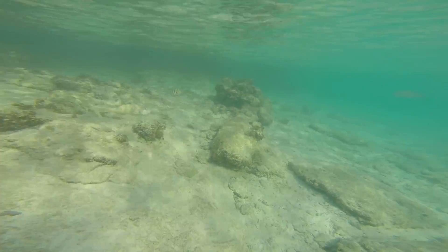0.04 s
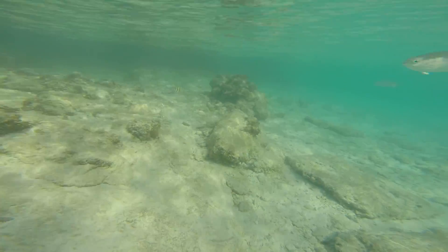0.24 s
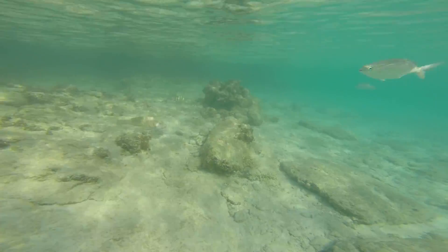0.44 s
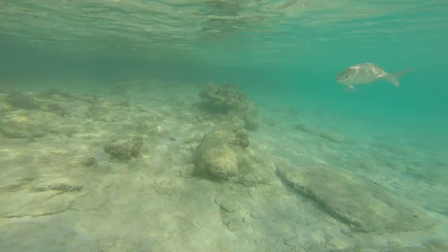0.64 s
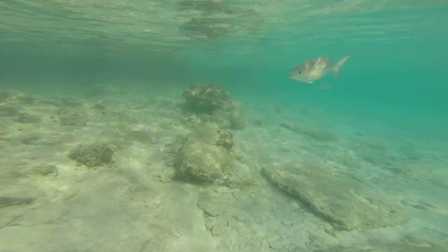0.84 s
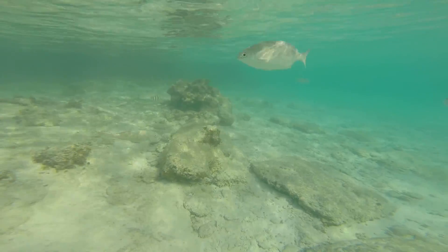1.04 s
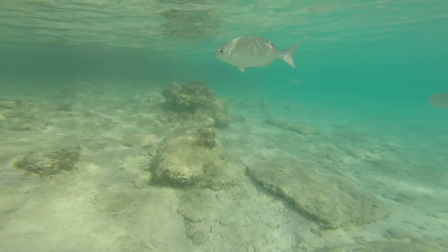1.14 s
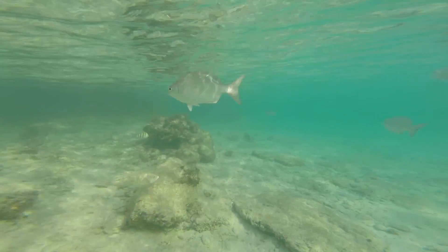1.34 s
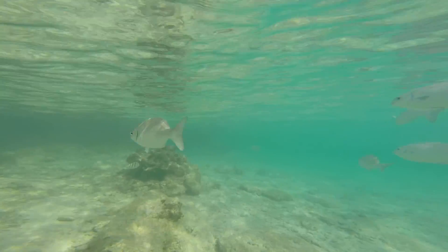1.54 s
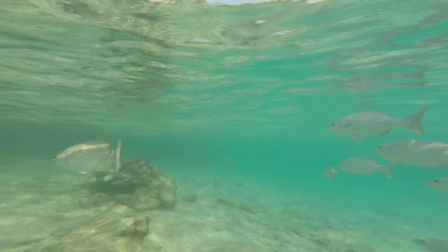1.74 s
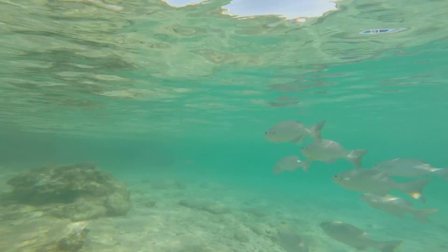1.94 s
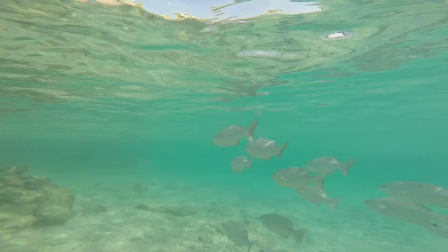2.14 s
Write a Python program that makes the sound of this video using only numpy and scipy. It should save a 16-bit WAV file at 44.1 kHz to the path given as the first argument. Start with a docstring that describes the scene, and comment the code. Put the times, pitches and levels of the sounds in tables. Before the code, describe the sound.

One sharp plastic knock sounds early, heard from inside a camera case drifting underwater. Quiet water hiss and low rumble continue with scattered shrimp clicks and a few tiny bubble blips, and water bumps the case past the middle.

```python
"""A sharp knock rings the plastic case of an underwater camera drifting over a shallow reef.
Snapping shrimp, near and far, crackle through its wall: each snap sets the same case ringing.
Water hisses, rumbles and sloshes round the case and shoves it twice, and a few small bubbles blip.
The camera's electronics add a faint whine."""
import sys
import numpy as np
from scipy import signal
from scipy.fft import rfft, irfft
from scipy.io import wavfile
from scipy.ndimage import uniform_filter1d

SR = 44100
rng = np.random.default_rng(int(sys.argv[2]) if len(sys.argv) > 2 else 0)


def wav_record(signal):
    """Record a signal, one row per channel, as 16-bit PCM in the file named by sys.argv[1]."""
    frames = np.transpose(np.atleast_2d(signal))
    bounded = np.clip(frames, -1, 1)
    # unit amplitude maps onto the largest positive 16-bit level
    quanta = np.round(bounded * 32767).astype(np.int16)
    wavfile.write(sys.argv[1], SR, quanta)


N = 97020


def amp(db):
    return 10 ** (np.asarray(db) / 20)


def unit(x):
    """Scales a sound to an average (rms) strength of 1."""
    return x / np.sqrt(np.mean(abs(x) ** 2) + 1e-20)


def add(mix, s, sound):
    """Mixes a sound in at s seconds."""
    part = mix[max(round(s * SR), 0):][:len(sound)]
    part += sound[:len(part)]


def band(x, hz, kind, order=2):
    """Keeps the low, high or middle pitches; a higher order cuts more sharply."""
    return signal.sosfilt(signal.butter(order, hz, kind, fs=SR, output="sos"), x)


def delayed(x, s):
    """A short sound, s seconds later."""
    hz = np.fft.rfftfreq(len(x), 1 / SR)
    return irfft(rfft(x) * np.exp(-2j * np.pi * hz * s), len(x))


def scattered(pulse, share, fade_s):
    """Adds a short noisy tail that fades by 60 dB in fade_s."""
    t = np.arange(len(pulse)) / SR
    return pulse + share * abs(pulse).max() * rng.standard_normal(len(t)) * amp(-60 * t / fade_s)


def wash(level_db=-56, patch_db=1.75, flicker_db=-0.1, size=512):
    """Steady water noise running up into hiss, wavering in small patches of pitch and time."""
    # tone of the water noise (pitch [Hz], relative level [dB])
    tone = [(25, 0), (50, 0), (100, -2), (200, -5.5), (350, -9.5), (600, -13.5), (1000, -16.5), (1700, -19),
            (2600, -21.5), (4200, -25), (6000, -28.5), (8000, -32), (10500, -34.5), (13000, -41.5),
            (15000, -48)]
    slices = signal.stft(rng.standard_normal(N), nperseg=size)[2]  # rows are pitches, columns are moments
    patches = uniform_filter1d(rng.standard_normal(slices.shape), size=5, axis=0)
    patches = unit(uniform_filter1d(patches, size=6, axis=1))
    flicker = unit(uniform_filter1d(rng.standard_normal(slices.shape[1]), size=4))
    stirred = signal.istft(slices * amp(patch_db * patches + flicker_db * flicker), nperseg=size)[1][:N]
    hz, db = np.transpose(tone)
    colour = amp(np.interp(np.log(np.fft.rfftfreq(N, 1 / SR) + 1), np.log(hz + 1), db))
    return amp(level_db) * unit(irfft(rfft(stirred) * colour, N))


def eddies(levels, low_hz, high_hz):
    """Swirls of one size range, swelling as water moves past the camera."""
    churn = unit(band(rng.standard_normal(N), [low_hz, high_hz], "band"))
    return churn * amp(np.interp(np.arange(N) / SR, *np.transpose(levels)))


def swirling_water():
    """Big swirls make a deep rumble, and smaller ones slosh above it."""
    # loudness of the rumble (time [s], level [dB])
    rumble = [(0, -65), (.5, -74), (1.1, -69), (1.28, -58), (1.43, -64), (1.62, -65.5), (1.95, -65),
              (2.08, -55.5), (2.2, -54.5)]
    # loudness of the sloshing (time [s], level [dB])
    slosh = [(0, -68), (.75, -65.5), (.92, -65), (1.15, -64.5), (1.75, -73), (1.9, -61.5), (2.2, -66)]
    return eddies(rumble, low_hz=23, high_hz=75) + eddies(slosh, low_hz=119, high_hz=372)


def whine(width_hz=6):
    """Thin, slightly unsteady tones of the electronics."""
    # the tones (pitch [Hz])
    pitches = [5845, 5874, 8781, 11719, 14626]
    # loudness of each tone (level [dB])
    levels = [-77, -80, -82, -90, -90]
    t, out = np.arange(N) / SR, np.zeros(N)
    for hz, db in zip(pitches, levels):
        drift = np.sqrt(2 * np.pi * width_hz / SR) * np.cumsum(rng.standard_normal(N))
        out += amp(db) * np.sqrt(2) * np.sin(2 * np.pi * hz * t + drift)
    return out


def housing(size=1536):
    """The ring of the case after one sharp pulse."""
    # the case's own notes (pitch [Hz], relative level [dB], time to fade by 60 dB [s])
    notes = [(1494, -31.5, 0.022), (1580, -27.5, 0.018), (1870, -24.5, 0.026), (2030, -27.5, 0.022),
             (2495, -18, .012), (2835, -23, 0.013), (3570, -35, 0.012), (4240, -43, 0.018),
             (6460, -30.5, 0.0036), (7480, -30, 0.0063), (8800, -42, 0.0066), (9470, -46, 0.012),
             (10800, -52, 0.0073), (13400, -39, .006)]
    t = np.arange(size) / SR
    return sum(amp(db - 60 * t / fade_s) * np.sin(2 * np.pi * hz * t) for hz, db, fade_s in notes)


def snap(levels_db, filters, crack=0.99, echo_spread=.4, window_s=.006):
    """One shrimp's crack rings the case and bounces back from its walls, the wave upside down."""
    # echoes inside the case (delay [ms], typical strength [ratio])
    case_echoes = [(0.583, 0.2), (0.967, 0.13)]
    ring = housing()
    pulse = scattered(ring / abs(ring).max(), share=0.34, fade_s=0.0065)
    pulse += crack * signal.unit_impulse(len(ring))
    echoes = sum(share * (1 + echo_spread * rng.uniform(-1, 1)) * delayed(pulse, ms / 1000)
                 for ms, share in case_echoes)
    parts = [amp(db) * unit(signal.sosfilt(sos, pulse - echoes)) for sos, db in zip(filters, levels_db)]
    return sum(parts) * np.sqrt(window_s * SR / len(pulse))  # levels count as if it lasted window_s


def shrimp(near_gain_db=-0.5, far_per_s=60):
    """Near snaps stand out of a faint random crackle of far ones."""
    # a snap's four pitch bands: body, click, crack and fizz (low edge [Hz], high edge [Hz])
    snap_bands = [(1300, 3200), (3450, 5350), (5700, 8100), (8600, 13200)]
    # near snaps, before near_gain_db (time [s], body [dB], click [dB], crack [dB], fizz [dB])
    near_snaps = [(0.0578, -81, -60, -59, -59), (0.078, -53.5, -59, -63, -50.5),
                  (0.1005, -43, -48.5, -77, -59), (0.2018, -81, -62, -84, -65),
                  (0.2336, -49, -53, -58, -63), (0.3035, -72, -58.5, -56.5, -56.5),
                  (0.3402, -52.5, -47, -53, -63), (0.3749, -69, -60.5, -57, -53.5),
                  (0.416, -70, -60, -63.5, -76), (0.5317, -82, -72, -61, -63),
                  (0.595, -64, -60.5, -56, -68), (0.6046, -81, -84, -61, -54), (0.6888, -49, -57, -71, -60),
                  (0.865, -82, -83, -75, -66), (0.873, -64, -58.5, -84, -66), (0.947, -58, -61, -86, -85),
                  (0.9911, -61, -63, -58.5, -60.5), (1.0474, -45, -51.5, -59, -67),
                  (1.1395, -83, -68, -73, -63), (1.1953, -62, -57, -64, -67),
                  (1.2152, -58, -50, -54.5, -52.5), (1.23, -50, -54, -73, -62),
                  (1.2397, -62, -58, -56.5, -57), (1.2712, -80, -63, -60, -59.5),
                  (1.2941, -58.5, -55.5, -57.5, -66), (1.3453, -52.5, -53, -55.5, -68),
                  (1.3849, -61, -58, -80, -71), (1.3913, -80, -58.5, -66, -64.5),
                  (1.432, -86, -66, -66, -68), (1.457, -78, -77, -66, -66), (1.484, -75, -81, -68, -66),
                  (1.5693, -60.5, -54, -69, -58), (1.64, -68, -67, -76, -62.5), (1.719, -63, -59, -68, -69),
                  (1.7621, -56.5, -53, -59.5, -63), (1.808, -84, -83, -68, -64),
                  (1.8547, -43.5, -41.5, -40, -51), (1.9013, -66, -60.5, -71, -63),
                  (1.909, -79, -71, -60.5, -68), (1.9657, -65, -62.5, -70, -55.5),
                  (2, -85, -60.5, -65, -74), (2.0126, -76, -60, -66, -68), (2.023, -75, -79, -74, -65.5),
                  (2.038, -65, -63, -87, -85)]
    # each band of a far snap, before its random size and colour (level [dB])
    far_levels = [-79, -78, -80, -84]
    out = np.zeros(N)
    filters = [signal.butter(4, edges, "band", fs=SR, output="sos") for edges in snap_bands]
    for s, *levels_db in near_snaps:
        add(out, s, amp(near_gain_db) * snap(levels_db, filters))
    for _ in range(round(far_per_s * N / SR)):
        size_db = 2.5 * min(rng.exponential(), 2)
        colour_db = rng.uniform(-3, 3, len(far_levels))
        add(out, rng.random() * N / SR, snap(np.array(far_levels) + size_db + colour_db, filters))
    return out


def bubbles(rise_cycles=3.1, glide_per_cycle=-0.0035, size=6000):
    """Soft blips and gurgles: the larger the bubble, the lower and longer it rings."""
    # ringing bubbles (time [s], starting pitch [Hz], level [dB])
    blips = [(0.209, 1390, -47), (.296, 1600, -53), (0.927, 338, -52), (1.422, 1260, -52),
             (1.837, 1770, -54.5), (1.883, 1790, -52.5), (1.891, 219, -53), (2.078, 1580, -55)]
    out = np.zeros(N)
    for s, hz, db in blips:
        cycles = hz * np.arange(size) / SR
        swell = cycles / rise_cycles * np.exp(1 - cycles / rise_cycles)
        sinking_hz = hz * np.exp(glide_per_cycle * cycles)
        add(out, s, amp(db) * swell * np.sin(2 * np.pi * np.cumsum(sinking_hz) / SR))
    return out


def knock(start_s=.2482, gain_db=2, wall_hz=1310, soften_hz=10400):
    """One sharp knock rings the case, with quick echoes that blend into it."""
    # quick echoes of the knock (delay [ms], strength [ratio; minus flips the wave])
    echoes = [(1.06, -0.66), (1.95, 0.83), (6.49, -0.083)]
    ring, out = housing(), np.zeros(N)
    blow = ring + sum(strength * delayed(ring, ms / 1000) for ms, strength in echoes)
    blow = scattered(blow, share=.04, fade_s=0.0061)
    blow = band(blow, wall_hz, "high", order=8)  # the stiff wall lets little low sound through
    add(out, start_s, amp(gain_db) * band(blow, soften_hz, "low", order=3))
    return out


def shoves(start_hz=300, end_hz=56.6, sag_s=0.0048, peak_s=0.017, width_s=.0062):
    """Dull thumps of water against the case, each a short wobble whose pitch drops."""
    # pushes of water (time [s], level [dB])
    pushes = [(1.416, -48), (1.472, -33)]
    t, out = np.arange(4096) / SR, np.zeros(N)
    hz = end_hz + (start_hz - end_hz) * np.exp(-t / sag_s)
    swell = 1 / np.cosh((t - peak_s) / width_s)
    wobble = swell * np.sin(2 * np.pi * np.cumsum(hz) / SR)
    for s, db in pushes:
        add(out, s, amp(db) * wobble)
    return out


def scene():
    """All the sounds together, in one channel."""
    water = wash() + swirling_water() + shoves() + bubbles()
    return (water + whine() + knock() + shrimp())[None]


def record(dry, edge_hz=15800):
    """The camera cuts off the very highest pitches."""
    treble_cut = signal.firwin(161, edge_hz, window=("kaiser", 8), fs=SR)
    return signal.oaconvolve(dry, treble_cut[None], "same")


dry = scene()
out = record(dry)
wav_record(out)
```